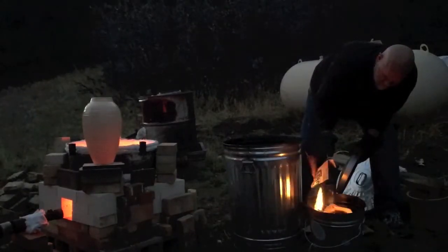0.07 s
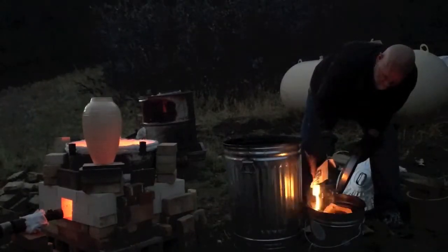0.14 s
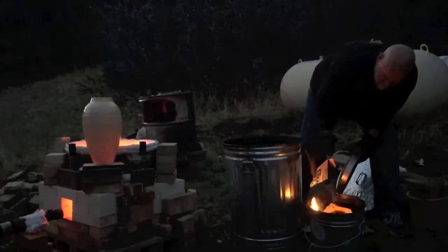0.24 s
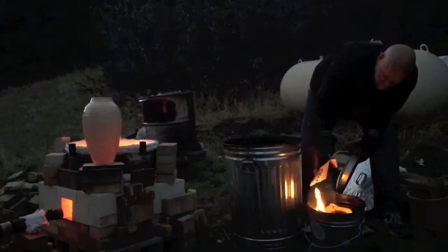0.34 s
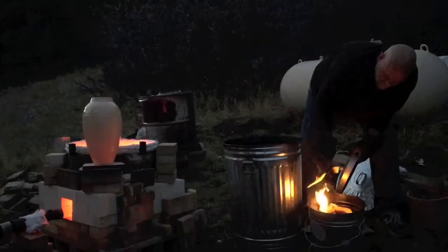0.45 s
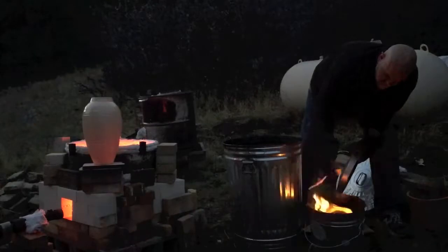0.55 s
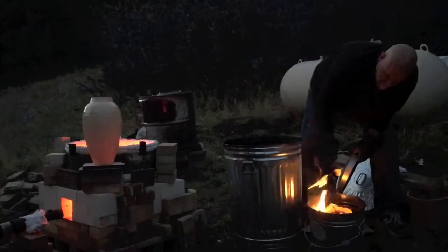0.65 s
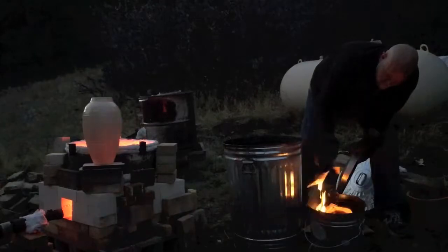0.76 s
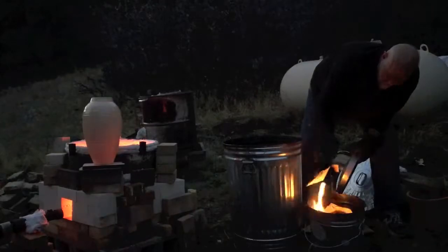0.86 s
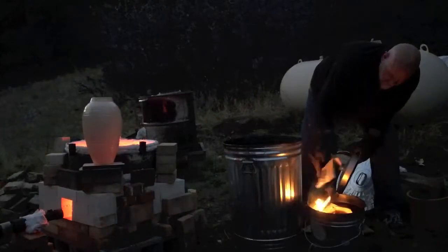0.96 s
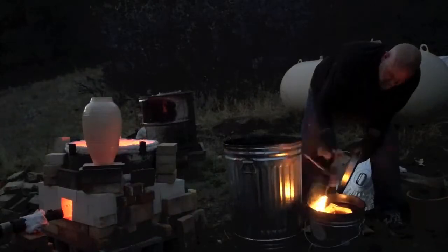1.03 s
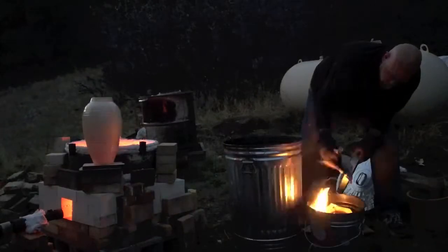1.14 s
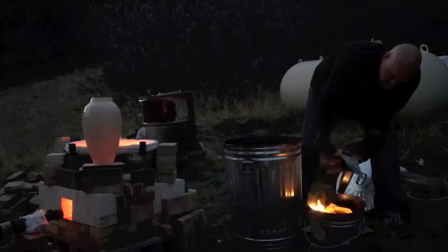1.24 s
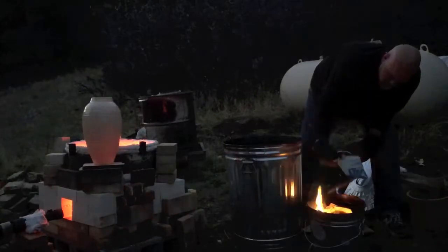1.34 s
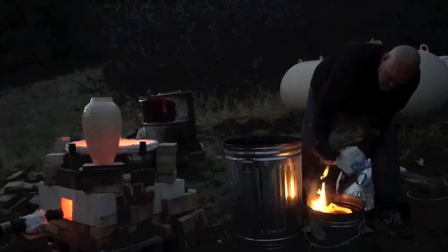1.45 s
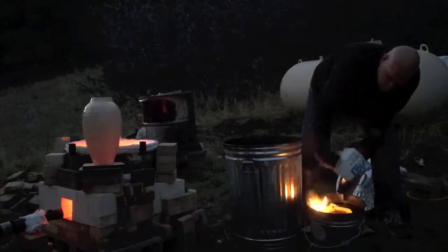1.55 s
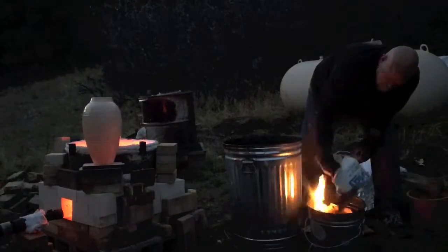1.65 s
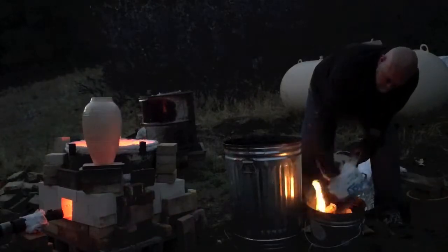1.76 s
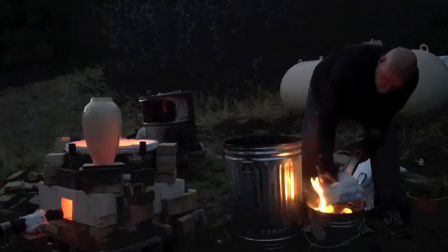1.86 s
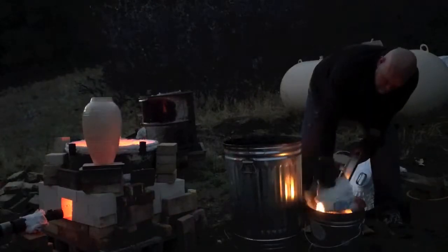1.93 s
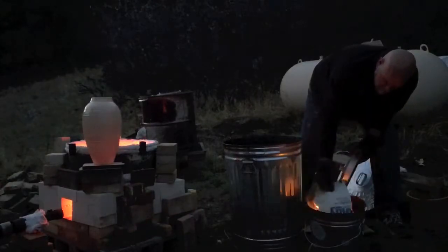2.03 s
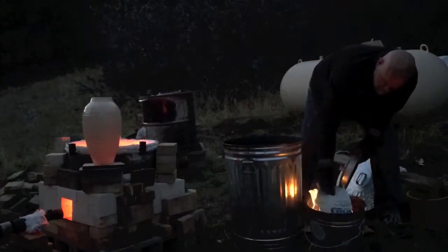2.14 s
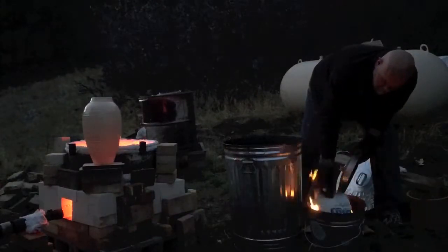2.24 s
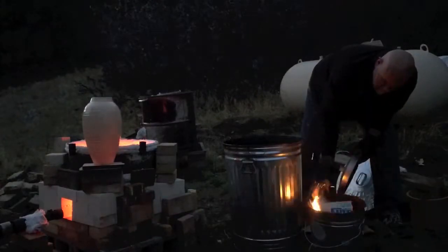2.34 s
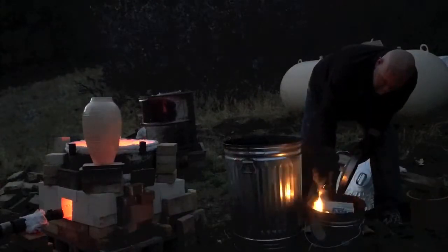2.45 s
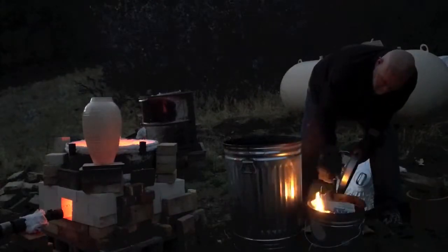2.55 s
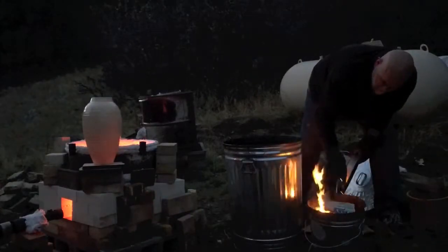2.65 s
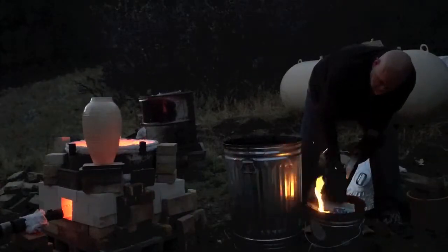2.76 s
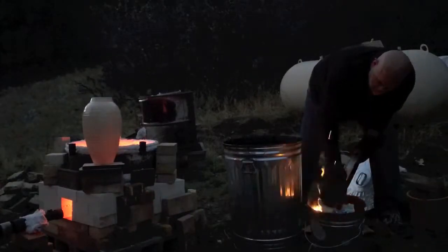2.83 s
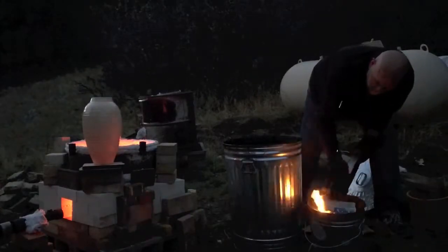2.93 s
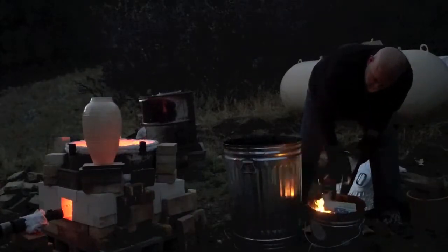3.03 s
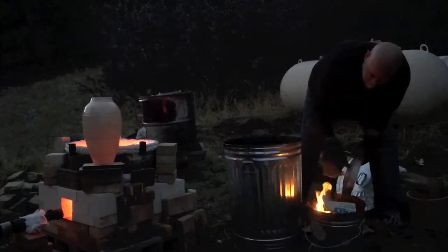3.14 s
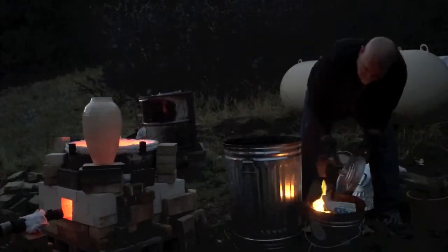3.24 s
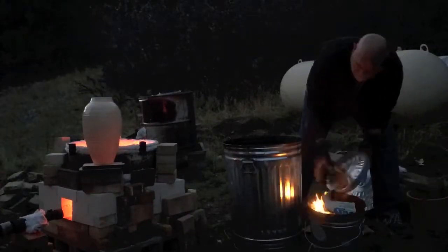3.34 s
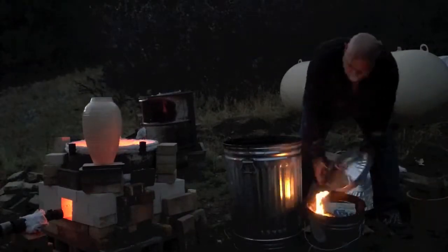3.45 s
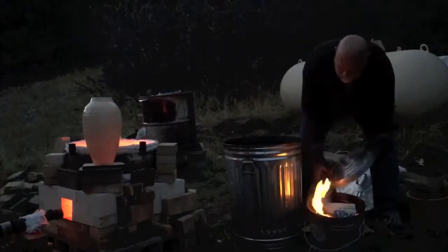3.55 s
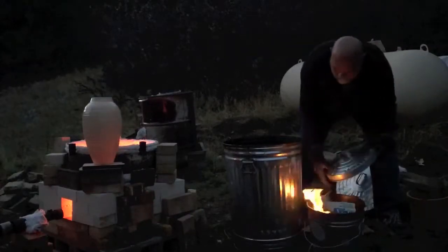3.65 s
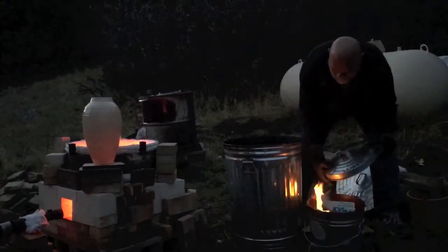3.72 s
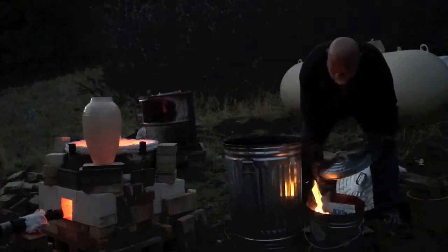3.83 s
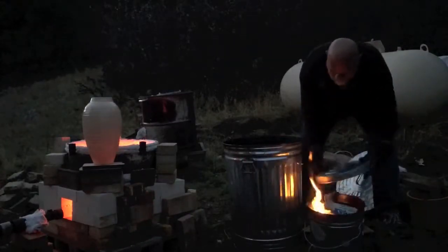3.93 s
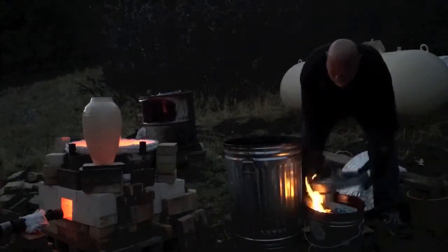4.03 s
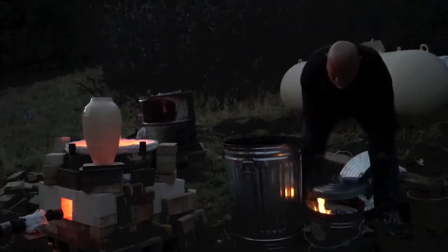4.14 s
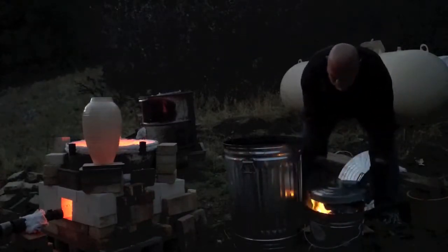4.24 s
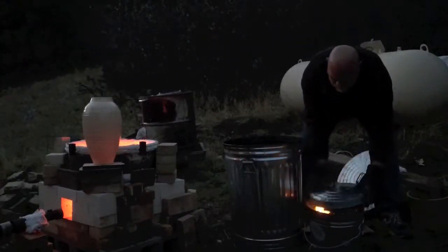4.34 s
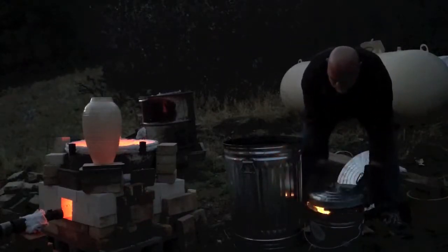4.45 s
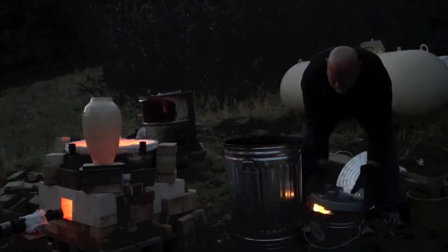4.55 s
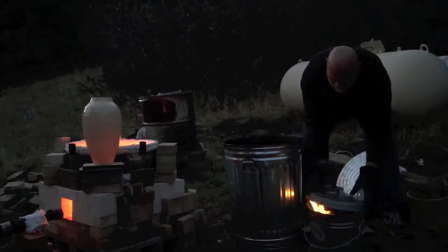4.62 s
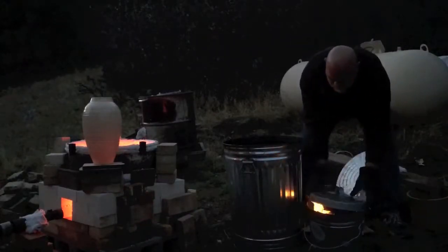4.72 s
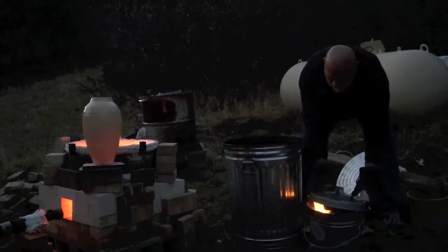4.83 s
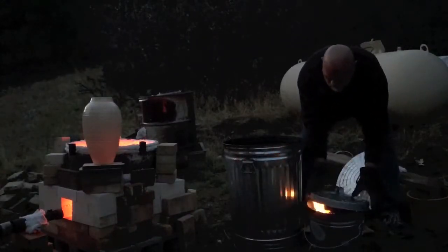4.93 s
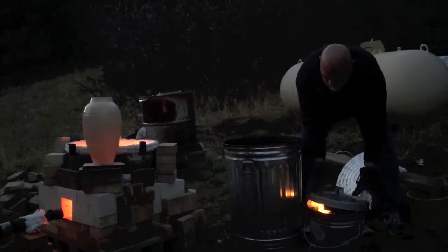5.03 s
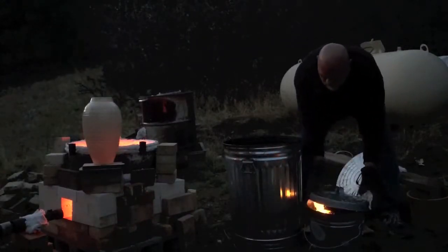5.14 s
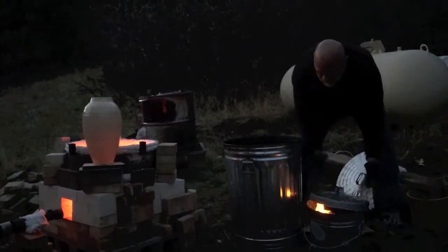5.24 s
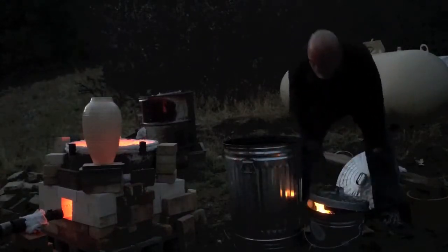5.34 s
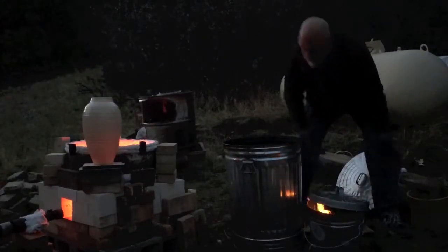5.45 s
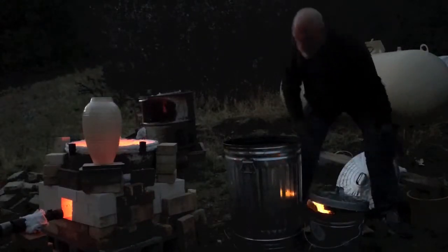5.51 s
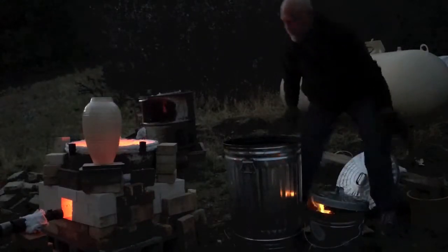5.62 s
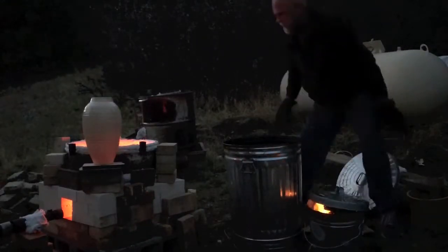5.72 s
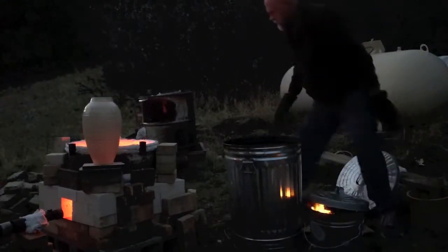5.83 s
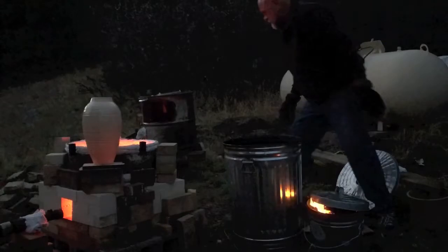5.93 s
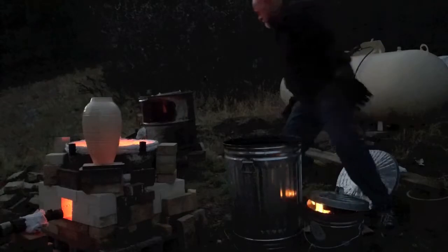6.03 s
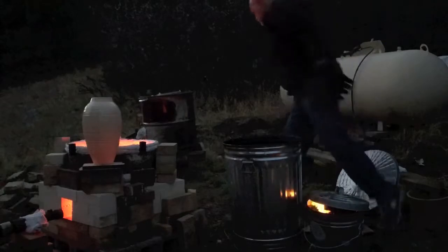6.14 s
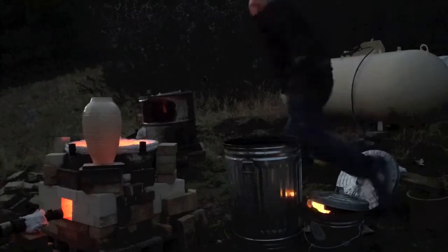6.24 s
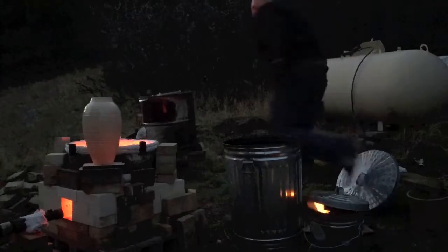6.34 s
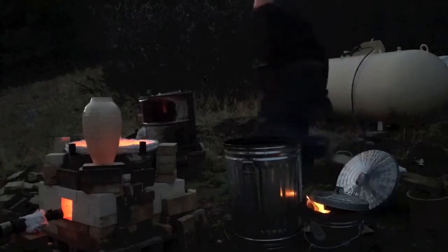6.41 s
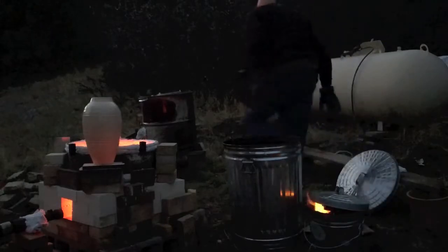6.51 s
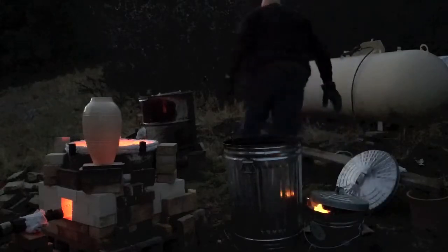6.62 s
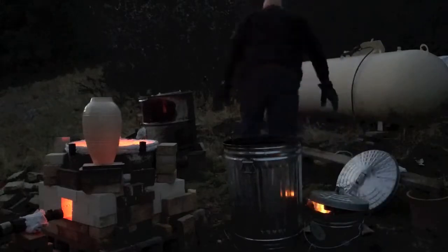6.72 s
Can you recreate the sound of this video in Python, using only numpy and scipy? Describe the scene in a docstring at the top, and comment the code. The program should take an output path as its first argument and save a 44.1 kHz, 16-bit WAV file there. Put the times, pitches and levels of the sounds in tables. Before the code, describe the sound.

Outdoors, a light breeze gives soft low puffs against the microphone over a faint steady hiss of air and fire. From 0.5 s come small crackles and faint rustles, with a sharper snap at 1.1 s. Around 1.85-2.4 s paper is crushed into a burning metal bin: a dense, crisp crumple with sharp cracks and a hollow low rustle, thinning to scattered snaps at 2.6 and 2.85 s. At 3.36 s a sheet-metal lid gives a bright, ringing clank, followed at 3.5 s by a brief high handle squeak. Quiet scrapes and light ticks follow as it is carried. At 4.37 s a dull thud precedes the loudest event, a hollow clattering bang at 4.55-4.66 s, with a last faint tap at 4.8 s. The ring dies quickly with slight near echoes. Breeze remains; from 5.6 s to the end at about 7 s, faint brushes and snaps suggest steps through dry grass.

```python
"""Outdoors at dusk: a light breeze (low noise in puffs) buffets the microphone over a faint hiss of air and
fire. Paper is crumpled into a burning steel bin: clumped creases, with snaps made of cracks and short rings. A
sheet-metal lid is picked up, carried and dropped on the bin: struck modes, scraping, a ringing handle. Then
someone steps away through dry grass: more brushes and snaps."""
import sys
import numpy as np
from scipy import signal
from scipy.io import wavfile
from scipy.ndimage import uniform_filter1d

SR = 44100
rng = np.random.default_rng(int(sys.argv[2]) if len(sys.argv) > 2 else 0)


def elevation(decibels):
    """Turn decibel levels (scalar or array-like) into linear amplitude ratios."""
    levels = np.asarray(decibels, float)
    return 10 ** (levels / 20)


def unload_wav(signal):
    """Save mono or channel-first audio to the path in sys.argv[1] as 16-bit WAV at rate SR, clipped to [-1, 1]."""
    wavfile.write(
        sys.argv[1],
        SR,
        np.round(np.clip(np.atleast_2d(signal).T, -1, 1) * 32767).astype(np.int16),
    )


N = 298733

# clear modes of the lid: (frequency [Hz], relative level [dB], undamped t60 [s])
LID_MODES = [(490.3, -1.5, 0.23), (612, -4, 0.26), (687, -9, 0.28), (910, -16.5, 0.59), (930, -6.5, 0.242),
             (1000, -22, 0.36), (1147.4, -4.5, 0.17), (1207, -8, 0.4), (1250, -17, 0.57),
             (1431, -12.5, 0.29), (1480, -16.5, 0.36), (1578, -13.5, 0.39), (1602, -11, 0.15),
             (1694, -14, 0.55), (1808, -7, 0.18), (1975, -13.5, 0.43), (2030, -9, 0.19), (2177, -8, 0.21),
             (2323, -8.5, 0.17), (2570, -11.5, 0.23), (2935, -8, .22), (3050, -18, 0.41), (3455, -9, 0.11),
             (3850, -16, 0.18), (4370, -14, 0.3), (4700, -15, 0.35), (4960, -14, 0.31), (5145, -14, 0.16),
             (5590, -9, 0.19), (5900, -21.5, 0.14)]
ENVELOPE_STEP = 64  # samples


def evened(x):
    """Scales to rms 1."""
    return x / np.sqrt(np.mean(x ** 2) + 1e-20)


def read(hz_points, values, hz):
    """Interpolates a spectrum on a log frequency axis."""
    return np.interp(np.log(hz + 1), np.log(np.asarray(hz_points) + 1), values)


def curve(rows):
    """Table columns over time, -120 outside the table."""
    s, *columns = np.transpose(rows)
    t = np.arange(N) / SR
    return [np.interp(t, s, column, left=-120, right=-120) for column in columns]


def add(mix, s, sound):
    """Mixes a sound in at time s."""
    part = mix[round(s * SR):][:len(sound)]
    part += sound[:len(part)]


def filtered(x, order, edges_hz, kind):
    """Butterworth filter."""
    return signal.sosfilt(signal.butter(order, edges_hz, kind, fs=SR, output="sos"), x)


def band(x, lo_hz, hi_hz, order=2):
    """Band-pass of rms 1."""
    return evened(filtered(x, order, [lo_hz, hi_hz], "band"))


def resonate(x, hz, width_hz):
    """Shifts hz down to zero, smooths and shifts back: a resonance of gain 1."""
    turn = np.exp(2j * np.pi * np.cumsum(hz * np.ones(len(x))) / SR)
    r = np.exp(-np.pi * width_hz / SR)
    return 2 * (turn * signal.lfilter([1 - r], [1, -r], x / turn)).real


def ring(modes, length, damping, turns):
    """Sum of dying sines, each starting at its own phase in turns."""
    t = np.arange(length) / SR
    return sum(elevation(db - 60 * t * damping / t60) * np.sin(2 * np.pi * (hz * t + turn))
               for (hz, db, t60), turn in zip(modes, turns))


def grains(per_s, spread_db, tail_s):
    """Clicks of uneven size, each with a short noisy tail."""
    size = elevation(spread_db * np.minimum(rng.exponential(1, N), 5))
    clicks = size * (rng.random(N) < per_s / SR)
    tail = np.exp(-np.arange(2000) / (tail_s * SR))
    power = abs(signal.oaconvolve(clicks ** 2, tail)[:N])
    return np.sqrt(power) * rng.standard_normal(N)


def bump(s, fade_s, rise):
    """dB shape peaking at 0 at s: falls 20 dB per fade_s, climbs 20 dB per rise * fade_s."""
    t = np.arange(0, N + ENVELOPE_STEP, ENVELOPE_STEP) / SR - s
    return -20 * np.maximum(t, -t / rise) / fade_s


def swells(rows, rise, shares=None):
    """Summed gain of (s, dB, .., fade) rows over time, each row weighted by its share."""
    gains = elevation(np.array([db + bump(s, fade_s, rise) for s, db, *_, fade_s in rows]))
    total = gains.sum(axis=0) if shares is None else shares @ gains
    return np.interp(np.arange(N) / ENVELOPE_STEP, np.arange(len(total)), total)


def breeze():
    """Lumpy pressure at the microphone: low noise that comes in puffs."""
    # (time [s], level [dB], upper share [dB])
    wind_levels = [(0.0, -57, -1.5), (0.36, -69, -1.5), (0.7, -65, -1.5), (1.21, -63.5, -1.5),
                   (1.39, -58, -1.5), (1.9, -58.5, -1.5), (2.09, -76, -1.5), (2.88, -79, -1.5),
                   (3.09, -76, -1.5), (3.2, -70, -1.5), (3.67, -63, -1.5), (4.05, -59, -1.5),
                   (4.62, -65, -1.5), (5.37, -61, -1.5), (5.47, -65, -1.5), (6.24, -64, -1.5),
                   (6.45, -74, -1.5), (6.77, -70, -1.5)]
    # single buffets: (time [s], level [dB], fade [s per 20 dB])
    gusts = [(.1, -58, .1), (.26, -57, .08), (.53, -54, .08), (1.175, -52, .08), (1.29, -52, .1),
             (1.46, -48, .1), (1.66, -54, .06), (2.0, -49, .2), (3.13, -58, .08), (3.24, -57, .06),
             (3.52, -51, .08), (3.9, -52, .08), (4.12, -49, .08), (4.46, -52, .12), (4.68, -45, .08),
             (4.955, -48, .08), (5.39, -53, .15), (5.72, -55, .1), (5.95, -54, .08), (6.07, -55, .06),
             (6.2, -48, .08), (6.325, -50, .05), (6.39, -50, .05), (6.73, -51, .08)]
    # low and upper band: (lower edge [Hz], upper edge [Hz])
    wind_bands = [(39, 100), (100, 180)]
    puff_db, puff_s = 3.5, .02
    db, upper_db = curve(wind_levels)
    puffs = filtered(rng.standard_normal(N), 2, 1 / (2 * np.pi * puff_s), "low")
    push = rng.standard_normal(N) * elevation(puff_db * evened(puffs))
    low, upper = (band(push, *edges, order=3) for edges in wind_bands)
    return (elevation(db) + swells(gusts, .8)) * (low + elevation(upper_db) * upper)


def air():
    """Smooth far hiss with faint drifting patches."""
    # (frequency [Hz], relative density [dB per Hz])
    hiss_spectrum = [(88, -27), (150, -9.5), (304, -10), (643, -16.5), (1500, -26), (1970, -26),
                     (2400, -28.5), (3040, -33), (10700, -35.5), (14700, -41.5), (16500, -46)]
    level_db, patch_db = -69.5, 1.2
    frames, hz = N // 256 + 5, np.fft.rfftfreq(1024, 1 / SR)
    real, imag, patches = rng.standard_normal((frames, 513, 3)).T
    patches = evened(uniform_filter1d(uniform_filter1d(patches, 12, 0), 14, 1))
    density_db = read(*np.transpose(hiss_spectrum), hz)[:, None]
    z = (real + 1j * imag) * elevation(density_db + patch_db * patches)
    return elevation(level_db) * evened(signal.istft(z, nperseg=1024, noverlap=768)[1][:N])


def rustle():
    """Clumped creases heard low, middle and high; the low part drums the air in the bin."""
    # crushes of paper, brushes of cloth and grass; zero fade mutes a row:
    # (time [s], level [dB], low share [dB], high share [dB], fade [s per 20 dB])
    crushes = [(0.49, -65, -7, -2, 0.02), (1.06, -68, -9, .1, .08), (1.145, -60, 0.3, -2.5, 0.03),
               (1.349, -69, 1.7, -5, 0.14), (1.511, -69.5, -8, -0.6, 0.16), (1.6, -64.5, -.9, 0.4, 0.09),
               (1.858, -52, -8.5, -4, .06), (1.991, -48, 0.9, -4.5, .11), (2.123, -56, -9, -1, .08),
               (2.2, -55, -6, 1.6, .13), (2.275, -53, -10, -1.5, .05), (2.346, -57, -4, -3.5, .08),
               (2.488, -65.5, -1, -9, .06), (2.57, -65.5, -2.5, -6, 0.1), (2.84, -56.5, -.9, -4.5, 0.07),
               (2.949, -66, -1, -4, 0.03), (3.031, -71, -1.5, -0.5, 0), (3.127, -73, 2.5, -3, 0.11),
               (5.601, -67.5, -0.2, -7.5, 0.14), (5.769, -72, 6, -11, 0.32), (6.145, -63, -3, -4, .05),
               (6.389, -73, -0.1, -6, .12), (6.565, -63, 1.5, -18, 0.06), (6.75, -73, 8, -8, .08)]
    # shares common to all rows: (middle [dB], low [dB], high [dB])
    crease_db = [-4, .1, -5.5]
    # the paper never lies quite still: (middle [dB], low [dB], high [dB])
    stir_db = [-90, -80, -94]
    # low, middle and high band: (lower edge [Hz], upper edge [Hz])
    crease_bands = [(340, 1300), (1500, 6500), (6000, 20000)]
    hollow_hz, rise = 250.6, .75
    shares = elevation(np.array([(0, low, high) for _, _, low, high, _ in crushes]) + crease_db).T
    mid_gain, low_gain, high_gain = (swells(crushes, rise, share) + elevation(db)
                                     for share, db in zip(shares, stir_db))
    crease = evened(grains(1600, 4.5, 0.0022)) + .5 * rng.standard_normal(N)
    low, middle, high = (band(crease, *edges) for edges in crease_bands)
    low = low + 0.89 * evened(resonate(resonate(crease, hollow_hz, 79), hollow_hz, 90))
    # neighbouring bands alternate in sign so that they join without a notch
    return low_gain * evened(low) - mid_gain * middle + high_gain * high


def snaps():
    """Each snap is a wide crack, its treble, and a short fuzzy ring at its own pitch."""
    # paper snaps and fire pops, and at 2.445 s a knock ringing at 612 Hz: (time [s], level [dB], ring pitch
    # [Hz], ring share [dB], treble share [dB])
    cracklings = [(0.48, -50, 2300, -11, -3.5), (0.649, -53.5, 565, -4, -7), (0.956, -55.5, 545, -5, -1),
                  (1.032, -51, 5120, -6, -2.5), (1.051, -51, 6100, -4.5, -2.1), (1.088, -41, 2560, -7, -6),
                  (1.143, -34.5, 883, -10, -5), (1.182, -45, 541, -8, -1), (1.331, -52, 587, -9, 1),
                  (1.516, -48, 5600, -6, 0), (1.585, -44, 595, -8, -13), (1.624, -43.5, 3760, -9, -3),
                  (1.669, -51, 536, 1, 6), (1.729, -53.5, 627, -6.5, -0.6), (1.791, -48.5, 5570, -7, 1),
                  (1.826, -47.5, 1170, -2, -14), (1.858, -38, 2960, -4, -1), (1.912, -29, 3000, -2, -9),
                  (1.95, -37.5, 1690, -8, 0), (1.977, -34, 4510, -12, -5), (1.999, -34.5, 563, 0, -5),
                  (2.112, -31.5, 1980, -10.5, -2), (2.13, -40, 3870, -10.5, -4.5),
                  (2.151, -39, 5400, -8, -11), (2.173, -35, 1850, -7.5, -4), (2.212, -36.5, 1250, -9, -3.5),
                  (2.284, -36, 1147, -12.5, 4), (2.329, -42, 2880, -8, -2), (2.355, -40.5, 4900, -13, -4.5),
                  (2.445, -46.5, 612, 7, -17), (2.474, -52, 579, -9, -8), (2.612, -36, 3840, -10.5, -6.5),
                  (2.826, -39.5, 1890, -6.5, -4), (2.853, -42, 1130, 0, -9), (2.943, -45.5, 1170, -3.5, -5),
                  (3.112, -51.5, 939, -7.5, -21), (5.583, -47, 525, -12, 3), (6.13, -46, 910, -6, -8),
                  (6.384, -45, 596, -9.5, -4.5), (6.591, -50.5, 563, -0.5, -10.5),
                  (6.681, -54, 627, -9.5, -8), (6.74, -51.5, 546, -6.5, -14)]
    t60_s = .026
    out, t = np.zeros(N), np.arange(4000) / SR
    cracks = rng.standard_normal((len(cracklings), len(t)))
    for (s, db, hz, ring_db, treble_db), crack in zip(cracklings, cracks):
        tone = elevation(ring_db) * evened(resonate(crack, hz, 0.085 * hz)) * (1 - np.exp(-t / 0.00167))
        treble = elevation(treble_db) * band(crack, 3200, 15000, order=1)
        wide = band(crack, 550, 3860, order=1) + treble
        add(out, s, elevation(db - 60 * t / t60_s) * (.95 * tone + .285 * wide))
    return out


def favour(hz, favoured_hz):
    """The place of contact lifts the modes near one pitch (dB)."""
    return 7.5 * np.exp(-(np.log((hz + 1) / favoured_hz) / 0.21) ** 2)


def blow(db, bright_db, thud_db, thud_hz, favoured_hz, damping):
    """Rim contact rings the clear modes, the crowded ones and the hollow of the bin."""
    # crowded modes: (frequency [Hz], relative level [dB], undamped t60 [s])
    crowded_modes = [(130, -38, .2), (330, -5, .2), (780, -3, 0.27), (1170, 8.5, 0.4), (1750, -7.5, 0.98),
                     (2250, -2, 0.36), (3050, -2, 0.58), (4360, -2.5, 0.22), (5360, -1, 0.31),
                     (8100, -8.5, 0.29), (16500, -19, 0.12)]
    pivot_hz = 1500
    length = SR * 3 // 4
    t = np.arange(length) / SR

    def colour(hz):
        """Level tilted about the pivot (dB)."""
        return db + bright_db * np.clip(np.log2((hz + 1) / pivot_hz), -1.6, 1.8)

    modes = [(hz, mode_db + colour(hz) + favour(hz, favoured_hz), t60) for hz, mode_db, t60 in LID_MODES]
    # the rim chatters at first, which smears the lines
    wobble = evened(uniform_filter1d(rng.standard_normal(length), 500))
    chatter = 1 + .55 * np.exp(-t / .12) * wobble
    clear = ring(modes, length, damping, rng.random(len(modes))) * chatter * (1 - np.exp(-t / 0.0015))

    hz, frame_s, z = signal.stft(rng.standard_normal(length), SR, nperseg=128)
    at_hz, sheet_db, t60 = np.transpose(crowded_modes)
    level_db = read(at_hz, sheet_db, hz) + colour(hz) + .5 * favour(hz, favoured_hz)
    fade_db = 60 * damping * frame_s / read(at_hz, t60, hz)[:, None]
    # held lid: a fast first drop, then the slower ring
    shape = elevation(level_db[:, None] - fade_db) * (1 + 1.6 * np.exp(-frame_s / 0.0092))
    crowd = signal.istft(z * shape, SR, nperseg=128)[1][:length] * (1 - np.exp(-t / .0005))

    thud = ring([(thud_hz, thud_db, .13)], length, damping, [0]) * (1 - np.exp(-t / .0025)) ** 2
    return elevation(-1.2) * clear + elevation(.7) * crowd + thud


def blows():
    """Contacts of lid and bin, each ringing on its own."""
    # (time [s], ring level [dB], brightness [dB per octave], thud level [dB], thud pitch [Hz],
    #  favoured pitch [Hz], damping factor of the grip [-])
    contacts = [(2.853, -63, -5.5, -39, 252, 1100, 1.7), (3.357, -30, 2.1, -26, 231, 620, 1.26),
                (3.657, -50.5, 0.7, -55.5, 234, 610, 1.44), (3.713, -52.5, 2.1, -56, 234, 930, 1.4),
                (3.831, -56.5, 1.2, -61, 234, 612, .9), (3.943, -59, -0.2, -57, 234, 1975, 1.9),
                (3.997, -58.5, 2, -50, 241, 2935, 1.6), (4.172, -58.5, 1.5, -61, 234, 2570, 1.2),
                (4.371, -41, -6, -14.5, 260, 515, 2.2), (4.484, -60, .4, -50.5, 230, 2030, 1.1),
                (4.553, -22, -1.6, -11.5, 224, 2950, 1.5), (4.598, -29.5, -1.1, -18.5, 243, 1150, 1.3),
                (4.660, -40.5, -1.76, -32, 193, 1220, .75), (4.787, -55.5, 0.7, -46, 199, 5000, 1.6)]
    out = np.zeros(N)
    for s, *row in contacts:
        add(out, s, blow(*row))
    return out


def scraping():
    """Dense scraping keeps the damped sheet singing while it is carried."""
    # gloves and rim on the lid: (time [s], level [dB])
    carry_levels = [(3.47, -60), (3.57, -62), (3.645, -74), (3.7, -66), (3.81, -69), (3.9, -65),
                    (4.11, -66), (4.27, -67), (4.37, -60), (4.45, -70), (4.54, -54)]
    # the grip shifts: (time [s], level [dB], fade [s per 20 dB])
    grip_shifts = [(3.664, -52, .06), (3.84, -54, .1), (3.94, -60, .06), (4.003, -58, .06),
                   (4.19, -58, .12)]
    damping = 3.5  # the held sheet rings this many times shorter
    gain = elevation(curve(carry_levels)[0]) + swells(grip_shifts, .45)
    rub = filtered(gain * evened(grains(2500, 3.5, .003)), 1, 900, "high")
    rung, frames = np.zeros(N), N // 1024 + 2
    # the fingers wander, so each mode is fed by fits and starts
    wander = evened(uniform_filter1d(rng.standard_normal((len(LID_MODES), frames)), 5, 1))
    for (hz, db, t60), fits in zip(LID_MODES[6:], wander):
        feed = rub * elevation(7 * np.interp(np.arange(N) / 1024, np.arange(frames), fits))
        turn = 2 * np.pi * hz / SR
        r = 10 ** (-3 * damping / t60 / SR)
        rung += elevation(db) * np.sin(turn) * signal.lfilter([1], [1, -2 * r * np.cos(turn), r * r], feed)
    hiss = filtered(rub, 1, [1500, 7000], "band")
    return elevation(-35) * rung + elevation(1.5) * hiss


def handle_ring():
    """The wire handle rings once in its lugs; its close modes beat as they die."""
    # (frequency [Hz], level [dB], t60 [s])
    handle_modes = [(1723, -40, .3), (1771, -39, .26), (1810, -33, .1), (3456, -50, .19)]
    start_s, rise_s = 3.518, .007
    out, t = np.zeros(N), np.arange(SR // 2) / SR
    tone = ring(handle_modes, len(t), 1, np.zeros(len(handle_modes)))
    add(out, start_s, tone * (1 - np.exp(-t / rise_s)) ** 2)
    return out


def yard(x):
    """Near echoes from ground, bin and tank: 64 dying taps of random delay and sign."""
    t60_s = .09
    taps = np.zeros(4000)
    at = np.arange(100, 3900, 60) + rng.integers(0, 60, 64)
    taps[at] = rng.choice([-1., 1.], 64) * elevation(-60 * at / SR / t60_s)
    return signal.oaconvolve(x, taps / np.linalg.norm(taps))[:N]


def scene():
    """All sources, one channel."""
    near = blows() + scraping() + handle_ring() + snaps()
    return (near + elevation(-8.5) * yard(near) + rustle() + breeze() + air())[None]


def band_limit(x):
    """A steep low-pass at the top of the band."""
    return signal.sosfilt(signal.butter(12, 16800, fs=SR, output="sos"), x)


def record(dry):
    """Band limit by a linear-phase low-pass."""
    edge_hz = 16150
    edge = signal.firwin(301, edge_hz, window=("kaiser", 5), fs=SR)
    mix = signal.oaconvolve(dry, edge[None], "same")
    return band_limit(mix)


dry = scene()
out = record(dry)
unload_wav(out)
```